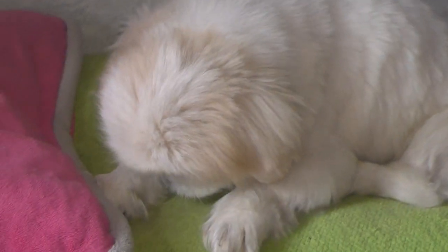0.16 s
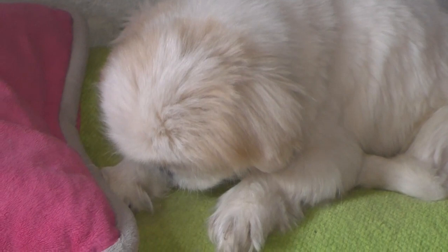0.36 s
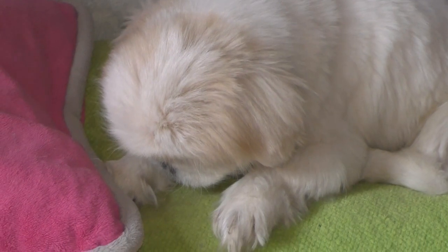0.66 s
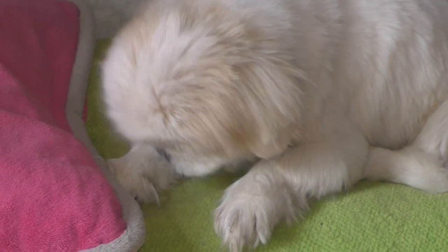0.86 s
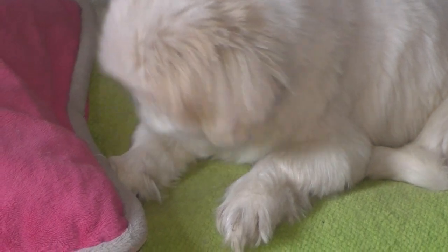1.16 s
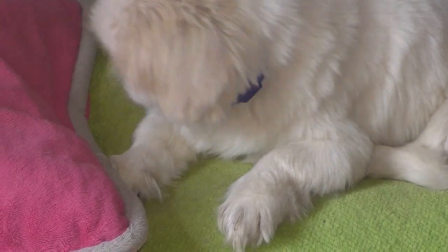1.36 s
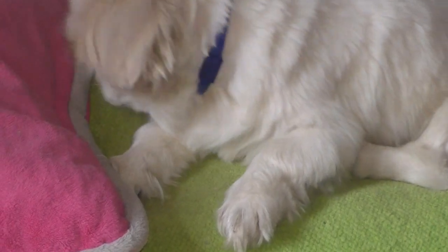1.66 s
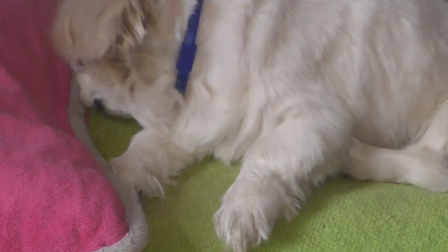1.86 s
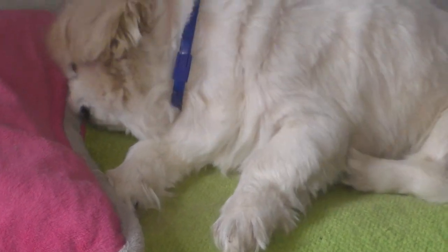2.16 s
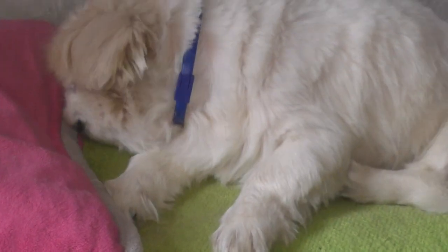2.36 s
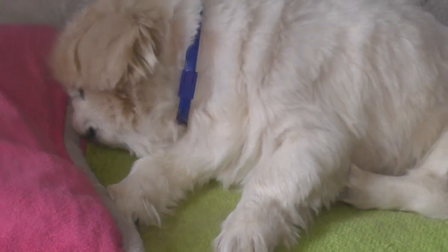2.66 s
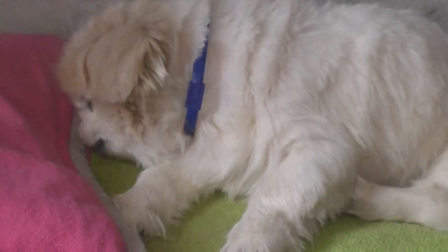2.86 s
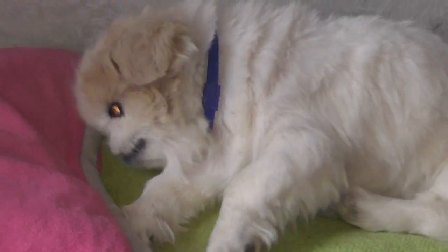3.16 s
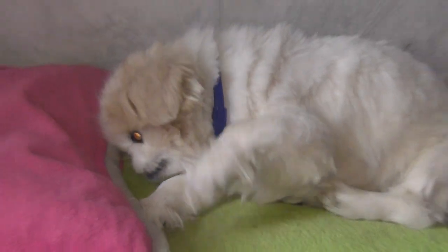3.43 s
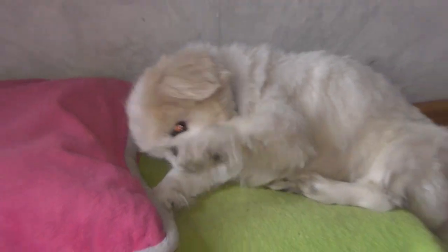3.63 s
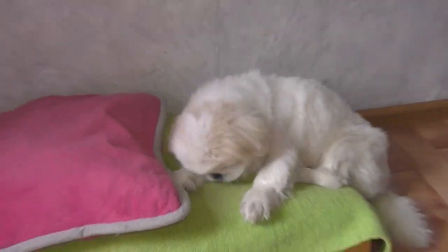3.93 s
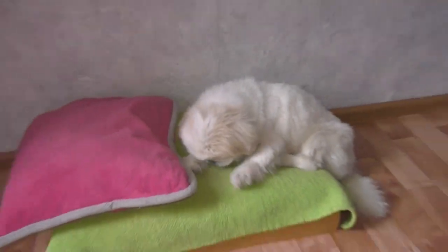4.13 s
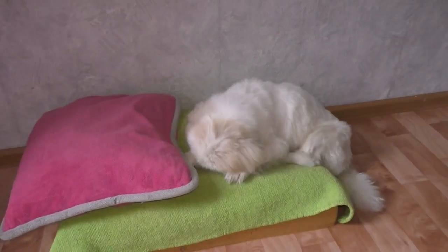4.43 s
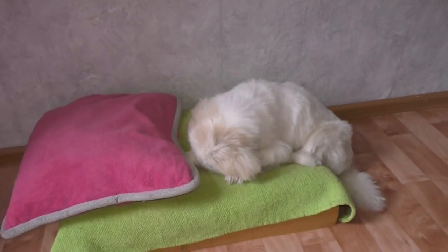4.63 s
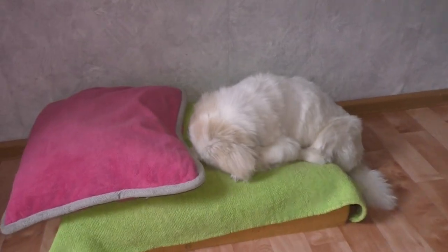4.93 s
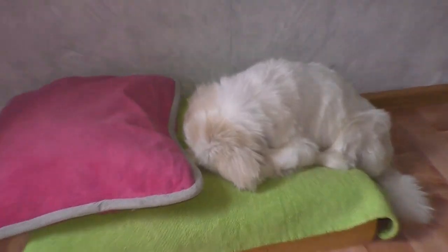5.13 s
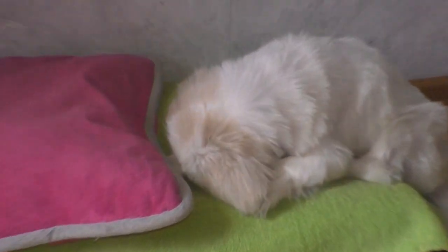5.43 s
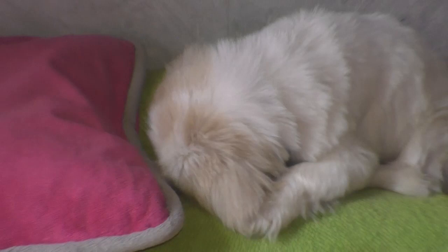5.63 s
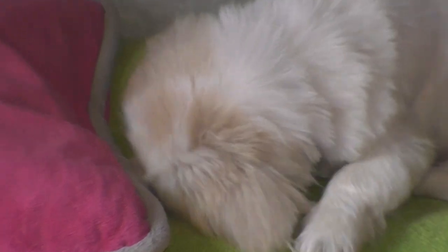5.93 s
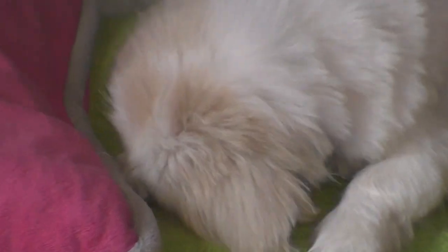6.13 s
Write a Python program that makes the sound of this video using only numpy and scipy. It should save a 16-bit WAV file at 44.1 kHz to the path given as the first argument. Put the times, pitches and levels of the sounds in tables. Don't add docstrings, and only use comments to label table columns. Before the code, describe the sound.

For about 0.45 seconds there is only faint room air, microphone hiss and the fading end of a low ring. Then paper begins to crumple, and a strong burst at 0.65-0.9 brings rustle, a dull flap and bright snaps. After a near lull around 1.0, crackling resumes at 1.2, with sharp cracks clustering from 1.4 to 1.8. A pull tightens towards 2.3, and the heaviest crumple and flap come at 2.4-2.6. Crisp snaps follow at 2.8, 3.05 and 3.3-3.4, then rustling thins before 4.1. From 4.1 to 5.3 short crinkly pulls come in quick succession with small rips and ticks. A firm flap and tear sound at 5.5-5.65, then softer, sparse crackle, a clear snap at 6.1 and a last small rip near 6.27. Everything is close, dry and slightly right, with a brief furnished-room tail.

```python
import sys
import numpy as np
from scipy import signal
from scipy.fft import rfft, irfft, next_fast_len
from scipy.io import wavfile

SR = 44100
rng = np.random.default_rng(int(sys.argv[2]) if len(sys.argv) > 2 else 0)


def invert_db(level):
    return 10 ** (np.asarray(level, dtype=float) / 20)


def to_wav(sig):
    pcm = np.clip(np.atleast_2d(sig), -1, 1) * 32767
    pcm = np.round(pcm).astype(np.int16)
    wavfile.write(sys.argv[1], SR, pcm.T)


N = 277389


def rms_one(x):
    return x / np.sqrt(np.mean(x ** 2) + 1e-20)


def at_hz(points, hz, axis=1):
    table = np.array(points, float)
    return np.interp(np.log(hz), np.log(table[:, 0]), table[:, axis])


def band(x, low_hz, high_hz):
    sos = signal.butter(2, [low_hz, min(high_hz, .45 * SR)], "band", fs=SR, output="sos")
    return signal.sosfilt(sos, x)


def drift(rate_hz):
    settle = 9000
    r = np.exp(-2 * np.pi * rate_hz / SR)
    slow = signal.lfilter([1], [1, -2 * r, r * r], rng.standard_normal(N + settle))
    return rms_one(slow[settle:])


def third_octaves(lowest_hz=100, count=22):
    edges = lowest_hz * 2 ** (np.arange(count + 1) / 3)
    return zip(edges, edges[1:])


# f/Hz, level/dB per Hz
HUSH_COLOUR = [(25, -8), (60, -3), (120, -6), (200, -5), (330, 0), (570, -19), (830, -17), (1000, -5),
               (2700, -5), (3500, -15), (5500, -21), (14000, -16), (16500, -25)]
# f/Hz, likeness/1
HUSH_LIKENESS = [(90, .0), (200, .6), (640, .4), (3000, .6), (15000, .9)]


def hush(level_db=-60.5, patchy_db=1.0):
    out, white = 0, rng.standard_normal((2, 2, N))
    for k, (low, high) in enumerate(third_octaves(20, 29)):
        hz = np.sqrt(low * high)
        mid, side = band(white[k % 2], low, high)
        alike = np.clip(at_hz(HUSH_LIKENESS, hz), -1, 1)
        gain = invert_db(at_hz(HUSH_COLOUR, hz) + patchy_db * drift(8.7))
        out = out + gain * (np.sqrt(1 + alike) * mid + np.sqrt(1 - alike) * side * [[1], [-1]])
    return invert_db(level_db) * rms_one(out)


# f/Hz, level/dB, t60/s
ROOM_MODE = (200, -58, 1.1)


def boom():
    hz, db, t60 = ROOM_MODE
    t = np.arange(N) / SR
    return invert_db(db - 60 * t / t60 + 2.5 * drift(12)) * np.sin(2 * np.pi * hz * t)


# t/s, length/s, rustle level/dB, sizzle over rustle/dB, thud over rustle/dB
BITES = [(.453, 0.037, -47.5, -14, -14), (.483, 0.16, -46, -13.5, -5), (.69, 0.16, -33.5, -7.5, -12),
         (1.135, 0.018, -54.5, -8, -15), (1.25, 0.15, -35.5, -4.5, -11.5), (1.44, 0.051, -43, -14, -9),
         (1.52, 0.26, -41, -8, -12.5), (1.72, 0.072, -43.5, -7, -14), (1.82, 0.044, -43.5, -5, -13.5),
         (1.9, 0.088, -46, -4.5, -13), (2.0, 0.099, -42, -9.5, -14.5), (2.365, 0.058, -39.5, -8, -18),
         (2.792, 0.094, -42.5, -10, -11.5), (2.9, 0.087, -45, -17, -14.5), (3.003, 0.0077, -52.5, -1, -3),
         (3.052, 0.12, -43, -6, -14), (3.369, 0.04, -41, -2.5, -30), (3.485, 0.26, -46.5, -3, -12),
         (3.669, 0.021, -39, -8.5, -17.5), (3.794, 0.1, -44.5, -6, -13.5), (4.17, 0.048, -39.5, -0.5, -8),
         (4.827, 0.041, -38, 1.5, -12), (5.533, 0.067, -36, -10.5, -11.5), (5.895, .12, -46.5, -6.5, -10)]
# t/s, length/s, final rustle level/dB, sizzle over rustle/dB, thud over rustle/dB
PULLS = [(.637, 0.037, -39, -5.5, -11.5), (1.205, 0.063, -45.5, -5.5, -11), (2.1, 0.17, -35.5, -7.5, -13.5),
         (2.43, 0.14, -31, -6, -14), (2.68, 0.094, -44.5, -9.5, -12.5), (3.231, .1, -37.5, -3.5, -14.5),
         (3.97, 0.084, -56, -10, -9), (4.123, 0.005, -42.5, -2, -16), (4.28, 0.094, -46, -5, -12),
         (4.36, 0.11, -39, -3.5, -12.5), (4.5, 0.1, -43.5, -3.5, -12), (4.619, 0.066, -40, -2.5, -10.5),
         (4.708, 0.079, -38.5, -1, -15), (4.94, 0.062, -42.5, -4, -11), (5.099, 0.069, -41.5, -5.5, -11),
         (5.18, 0.053, -40, -3.5, -12.5), (5.27, 0.067, -49, -8, -10), (5.345, 0.062, -47, -7.5, -12),
         (5.45, 0.064, -47, -8.5, -12), (5.628, 0.099, -44.5, -11, -14), (5.74, 0.047, -50, -8.5, -7.5),
         (6.05, 0.074, -48, -1, -11.5), (6.127, 0.014, -46, -13, -12), (6.2, 0.1, -43, -5, -13)]
SLACKEN_DB_PER_S, TIGHTEN_DB_PER_S = 30.5, 31
ATTACK_DB_PER_S, RELEASE_DB_PER_S = 4000, 228
REST_FROM_S = .451
REST_DB, REST_SIZZLE_DB, REST_THUD_DB = -58, -11.5, -13


def effort(slope=1, sizzle=0, thud=0):
    t = np.arange(0, N, 64) / SR
    rest_db = REST_DB + sizzle * REST_SIZZLE_DB + thud * REST_THUD_DB
    power = invert_db(2 * rest_db) * (t > REST_FROM_S) + 1e-12
    for rows, slacken, tighten in [(BITES, SLACKEN_DB_PER_S, 0), (PULLS, 0, TIGHTEN_DB_PER_S)]:
        for s, length, db, sizzle_db, thud_db in rows:
            held = np.clip(t - s, 0, length)
            attack = ATTACK_DB_PER_S * np.maximum(s - t, 0)
            release = RELEASE_DB_PER_S * np.maximum(t - s - length, 0)
            hold = slacken * held + tighten * (length - held)
            shape_db = -slope * (attack + release + hold)
            power = power + invert_db(2 * (db + sizzle * sizzle_db + thud * thud_db + shape_db))
    return np.interp(np.arange(N) / SR, t, 10 * np.log10(power))


# t/s, peak level/dB, f/Hz
FLAPS = [(.455, -39, 1680), (0.486, -31, 1550), (0.6116, -37, 2050), (0.6752, -30, 1950), (.734, -22, 1600),
         (1.1353, -39.5, 1270), (1.235, -29, 1900), (1.437, -24.5, 2400), (1.4859, -30, 2950),
         (1.61, -28.5, 1920), (1.822, -30, 1670), (1.84, -26.5, 2400), (2.0274, -27, 1570),
         (2.366, -27, 2470), (2.4506, -22.5, 2500), (2.5276, -17, 1890), (2.6367, -32.5, 1390),
         (2.8236, -28.5, 2670), (2.908, -31.5, 2380), (3.001, -27.5, 1850), (3.369, -23.5, 2570),
         (3.3986, -28, 3030), (3.6684, -29.5, 2120), (4.3706, -29, 2357), (4.616, -26, 2600),
         (4.7052, -26.5, 2070), (4.8276, -25, 1190), (5.5359, -21.5, 2900), (5.625, -28, 2000),
         (5.9924, -42, 1820)]


def flaps(rise_s=0.00088, fall_s=0.011, size=2048):
    out, t = np.zeros(N + size), np.arange(size) / SR
    envelope = (1 - np.exp(-t / rise_s)) * np.exp(-t / fall_s)
    luck = rng.standard_normal((len(FLAPS), size))
    for (s, peak_db, hz), hiss in zip(FLAPS, luck):
        burst = band(hiss * envelope, max(hz / 1.3, 950), hz * 1.51)
        i = round(s * SR)
        out[i:i + size] += invert_db(peak_db) * burst / np.abs(burst).max()
    return out[:N]


# f/Hz, level/dB per Hz
PAPER_COLOUR = [(110, -17.5), (190, -11), (310, -4), (470, -6.5), (600, -13), (830, -19), (1100, -4),
                (1900, -2), (3800, -4.5), (5500, -6), (10500, -7.5), (13500, -13), (16000, -26)]
WORK_HZ = [800, 900, 3200, 6500]
THUD_SLOPE, SIZZLE_SLOPE = 0.87, 1.25


def creases(per_s=3500, spread_db=4.0, colour_db=6.0, clump_db=1.4):
    rustle_db = effort()
    thud_db = effort(THUD_SLOPE, thud=0.97)
    sizzle_db = effort(SIZZLE_SLOPE, sizzle=1)
    levels = np.array([thud_db + 13.0, rustle_db + 3.0, rustle_db, sizzle_db + 3.0])
    clumps = invert_db(clump_db * (.5 * drift(25) + drift(120)))
    at = np.flatnonzero(rng.random(N) < per_s / SR)
    size_db = spread_db * np.minimum(rng.exponential(1, len(at)), 4.0)
    sizes = invert_db(size_db) * rng.choice([-1, 1], len(at))
    friction = rng.standard_normal((2, N))
    out, colour, shape = 0, rng.standard_normal(len(at)), drift(8.4)
    for k, (low, high) in enumerate(third_octaves()):
        hz = np.sqrt(low * high)
        colour = .8 * colour + .6 * rng.standard_normal(len(at))
        shape = .6 * shape + .8 * drift(10)
        clicks = np.zeros(N)
        clicks[at] = sizes * invert_db(colour_db * colour)
        source = rms_one((rms_one(clicks) + .5 * friction[k % 2]) * clumps)
        shares = [np.interp(np.log(hz), np.log(WORK_HZ), row) for row in np.eye(4)]
        gain = invert_db(at_hz(PAPER_COLOUR, hz) + shares @ levels + 1.4 * shape)
        out = out + gain * band(source, low, high)
    return out * invert_db(12.0)


def crackles(tries=60, over_rustle_db=11, centre_hz=5600, gate_db=-41.5):
    luck = rng.random((tries, 3))
    s = (np.arange(tries) + luck[:, 0]) / tries * (N - 1) / SR
    rustle_db = effort()[(s * SR).astype(int)]
    peak_db = rustle_db + over_rustle_db + 6 * (luck[:, 1] - .5)
    hz = centre_hz * 2 ** (luck[:, 2] - .5)
    return np.transpose([s, peak_db, hz])[rustle_db > gate_db]


# t/s, peak level/dB, f/Hz
SNAPS = [(.6391, -29, 5700), (.6871, -26, 7000), (.7007, -13.5, 8400), (.72, -17.5, 8900),
         (.7897, -16, 7200), (.8258, -17.5, 4000), (.8427, -24, 6000), (1.3756, -20.5, 5840),
         (1.4059, -22, 7800), (1.493, -17.5, 6400), (1.649, -14, 8500), (1.7177, -19, 11800),
         (1.764, -12, 9700), (1.7848, -19, 9200), (2.0296, -18.5, 4600), (2.106, -18, 5170),
         (2.3924, -12, 5000), (2.7918, -13.5, 8200), (3.0505, -15.5, 6100), (3.3001, -14, 4850),
         (3.3187, -22, 4250), (3.3693, -10, 9200), (3.5063, -22, 7740), (4.1226, -17, 7600),
         (4.207, -20.5, 7750), (4.5686, -20, 4800), (4.618, -19, 3930), (4.7071, -17, 4720),
         (5.6283, -17.5, 5000), (6.1263, -15, 5000)]
# t/s, peak level/dB, f/Hz
RIPS = [(.4873, -28.5, 4430), (.6775, -25, 5130), (.7982, -18, 7100), (1.245, -22.5, 6030),
        (1.4406, -24.5, 4120), (1.479, -17, 5430), (1.569, -28, 4770), (1.9302, -25.5, 6960),
        (2.0535, -21, 6340), (2.169, -19, 5470), (2.265, -24.5, 5600), (2.4683, -22, 4140),
        (2.48, -22.5, 5100), (2.534, -17, 9340), (2.5613, -30, 5700), (3.003, -27, 5600),
        (3.0985, -20, 7150), (3.1311, -22.5, 4600), (3.2295, -24.5, 4280), (3.389, -20.5, 5160),
        (3.6699, -22, 6900), (3.794, -20, 6800), (4.4539, -19, 6450), (4.735, -23, 7450),
        (4.8282, -19, 6130), (4.8664, -22, 9300), (5.0986, -24, 4200), (5.2093, -23.5, 7000),
        (5.5345, -18.5, 4870), (6.2652, -21.5, 4900)]
# t/s, peak level/dB, f/Hz
TICKS = [(.4514, -44, 5050), (.594, -63, 4140), (.615, -60, 4460), (1.2141, -50, 4030), (1.3504, -35, 4230),
         (1.5935, -28, 5600), (1.911, -32.5, 6000), (2.3461, -32, 6120), (2.7072, -31.5, 4500),
         (2.826, -31, 4400), (2.9083, -33, 4270), (3.485, -34, 6000), (3.7604, -26.5, 4000),
         (3.8764, -43, 5610), (4.074, -32, 8300), (4.3595, -36, 4300), (4.5092, -30, 8850),
         (4.597, -26.5, 3740), (4.668, -30, 7250), (4.9722, -32, 8400), (5.0664, -28, 5000),
         (5.355, -27.5, 4900), (5.396, -29, 4600), (5.6802, -33, 3800), (5.7977, -36, 4600),
         (5.8944, -39, 4300), (5.9137, -30, 4500), (5.9514, -35, 4260), (6.0397, -36, 9430),
         (6.207, -37, 6300)]
SNAP_AFTER_DB, RIP_AFTER_DB, TICK_AFTER_DB, CRACKLE_AFTER_DB = -17, -10.5, -9, -3.5


def snaps(tear_db=-6.0, tear_s=0.033, size=4096):
    kinds = [(SNAPS, SNAP_AFTER_DB), (RIPS, RIP_AFTER_DB),
             (TICKS, TICK_AFTER_DB), (crackles(), CRACKLE_AFTER_DB)]
    events = [(*row, after_db) for rows, after_db in kinds for row in rows]
    out, t = np.zeros(N + size), np.arange(size) / SR
    luck = rng.standard_normal((len(events), 3, size))
    fade = np.exp(-t / .0035) * (1 - np.exp(-t / .0005))
    for (s, peak_db, hz, after_db), (hiss, grain, rip) in zip(events, luck):
        crack = band((t == 0) + .5 * hiss * np.exp(-t / .0005), hz / 1.8, hz * 1.7)
        crack = .7 * crack / np.abs(crack).max()
        after = rms_one(band(hiss * invert_db(15.0 * grain), hz / 7.0, hz * 2.1)) * fade
        tear = rms_one(band(rip * invert_db(3.3 * grain), hz / 4.75, hz * 1.94)) * np.exp(-t / tear_s)
        i = round(s * SR)
        out[i:i + size] += invert_db(peak_db) * (crack + invert_db(after_db) * (after + invert_db(tear_db) * tear))
    return out[:N]


# f/Hz, t60/s, wet level/dB
ROOM = [(160, 0.77, -2), (390, 0.45, -7.5), (750, 0.36, -4.5), (2200, 0.16, -4), (5000, 0.13, -2.5),
        (12100, 0.017, -41.5)]
# delay t/s, level/dB
ECHOES = [
    (.0019, -23.5),
    (.0042, -17),
    (.0075, -22),
]


def room(x):
    direct = x.copy()
    for lag_s, db in ECHOES:
        lag = round(lag_s * SR)
        direct[lag:] += invert_db(db) * x[:-lag]
    t = np.arange(SR // 2) / SR
    white, tail = rng.standard_normal((2, 2, len(t))), 0
    for k, (low, high) in enumerate(third_octaves()):
        hz = np.sqrt(low * high)
        fade = invert_db(-60 * t / at_hz(ROOM, hz)) * (1 - np.exp(-t / 0.0007))
        wet = invert_db(at_hz(ROOM, hz, axis=2)) / np.sqrt(np.sum(fade ** 2))
        tail = tail + band(white[k % 2], low, high) * fade * wet
    return direct + signal.fftconvolve(x[None], tail, axes=1)[:, :N]


def scatter(x, from_hz=7000, side_db=-12.5):
    grain = rng.standard_normal(1500) * np.exp(-np.arange(1500) / 300)
    grain = grain / np.sqrt(np.sum(grain ** 2))
    side = signal.fftconvolve(grain, band(x.mean(axis=0), from_hz, .44 * SR))[:N]
    return x + invert_db(side_db) * side * [[1], [-1]]


# f/Hz, left minus right level/dB
LEAN = [(60, 0.5), (110, 0.0), (200, 0.0), (380, 0.0), (700, -1.5), (1290, -3.5), (2380, -3.5),
        (4400, -2.0), (8120, -0.5), (15000, -1.0)]


def lean(x):
    size = next_fast_len(N)
    hz = np.maximum(np.fft.rfftfreq(size, 1 / SR), 1)
    half = invert_db(at_hz(LEAN, hz) / 2)
    return irfft(rfft(x, size) * np.array([half, 1 / half]), size)[:, :N]


def scene():
    paper = room(creases()) + room(invert_db(-0.84) * snaps()) + room(invert_db(-2.0) * flaps())
    return lean(scatter(paper)) + hush() + boom()


def top_cut(x):
    return signal.sosfilt(signal.butter(12, 16810, fs=SR, output="sos"), x)


def record(dry):
    low_pass = signal.cheby2(24, 60, 16150, fs=SR, output="sos")
    mix = signal.sosfilt(low_pass, dry)
    return top_cut(mix)


dry = scene()
out = record(dry)
to_wav(out)
```